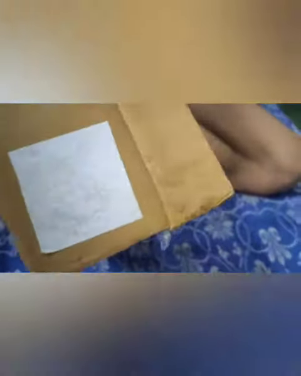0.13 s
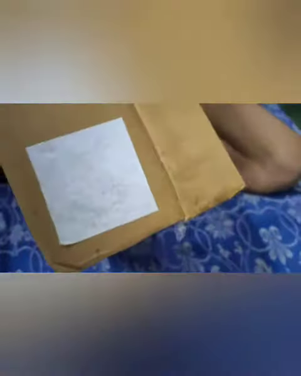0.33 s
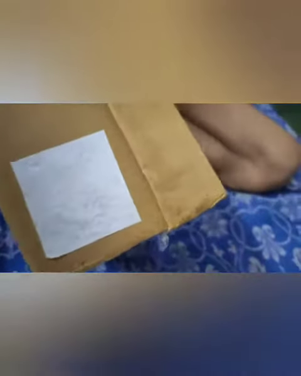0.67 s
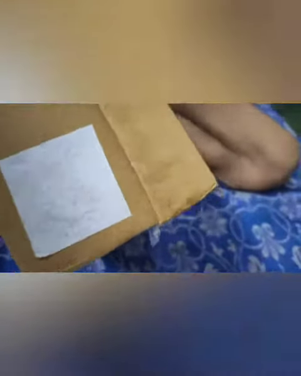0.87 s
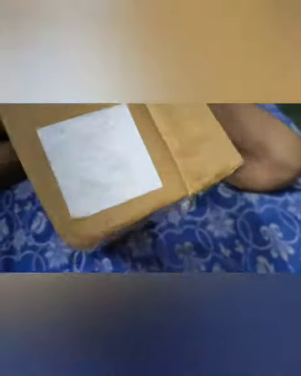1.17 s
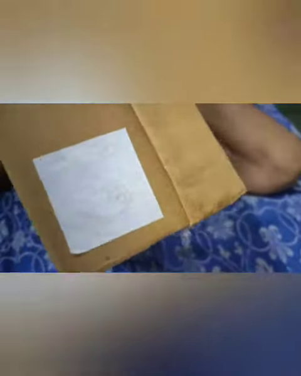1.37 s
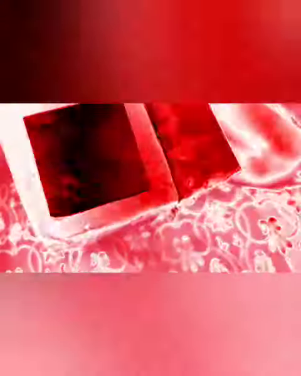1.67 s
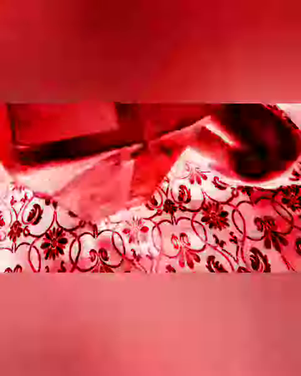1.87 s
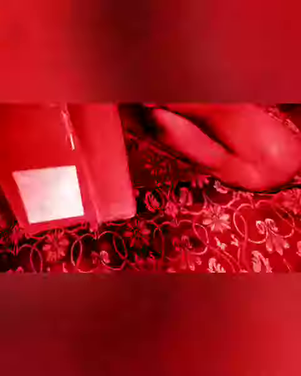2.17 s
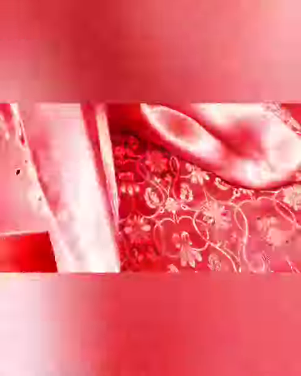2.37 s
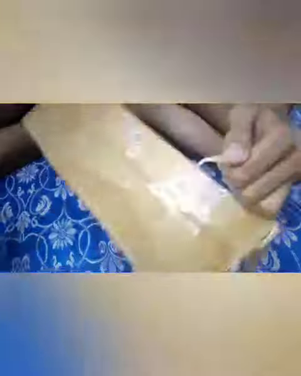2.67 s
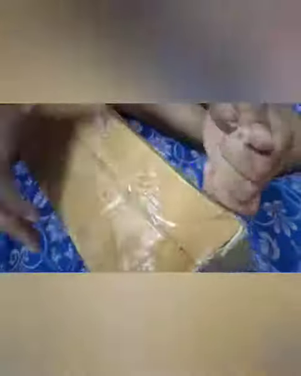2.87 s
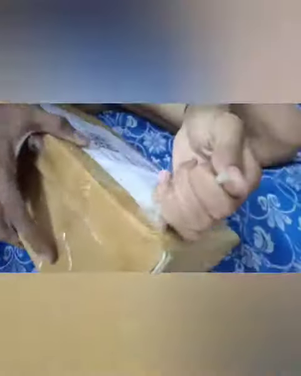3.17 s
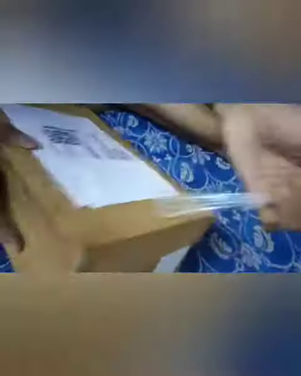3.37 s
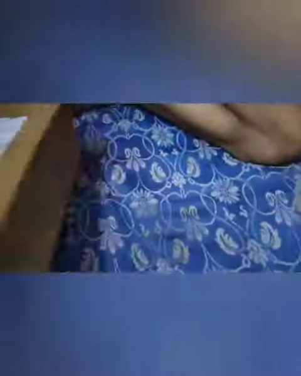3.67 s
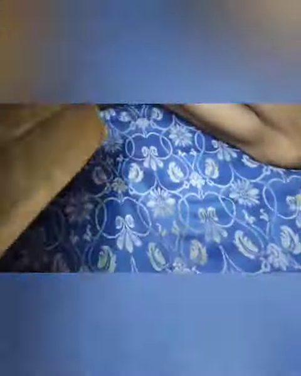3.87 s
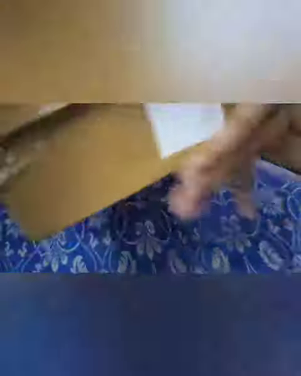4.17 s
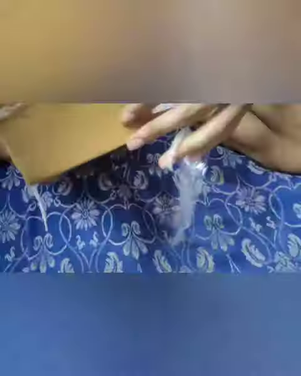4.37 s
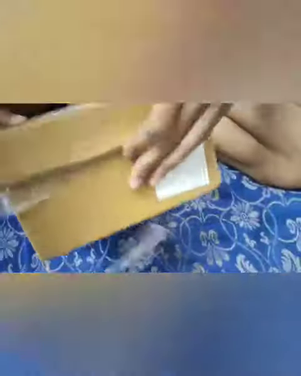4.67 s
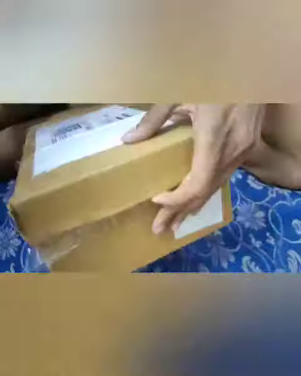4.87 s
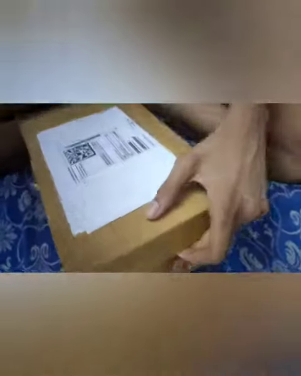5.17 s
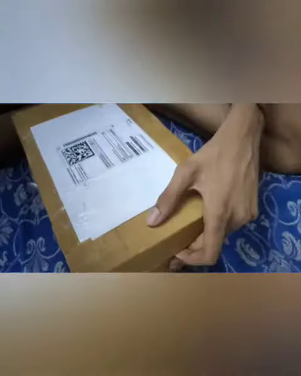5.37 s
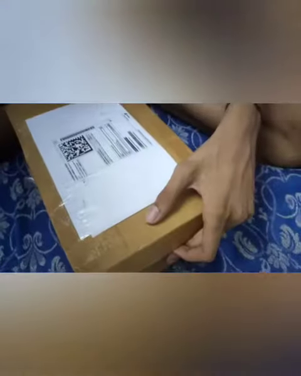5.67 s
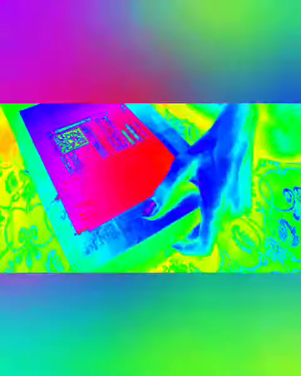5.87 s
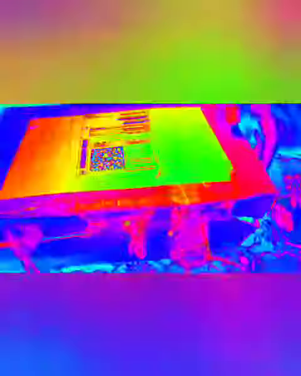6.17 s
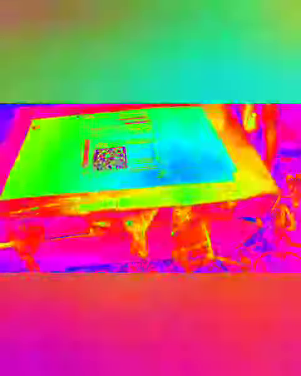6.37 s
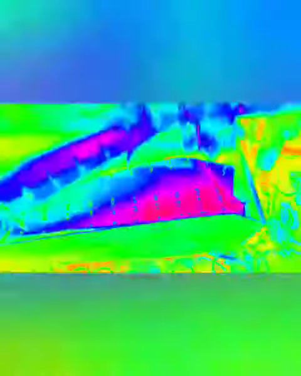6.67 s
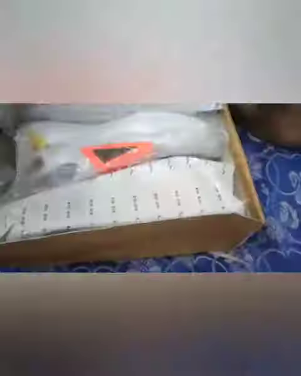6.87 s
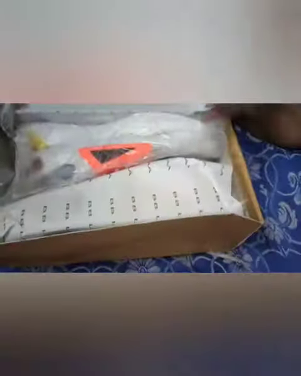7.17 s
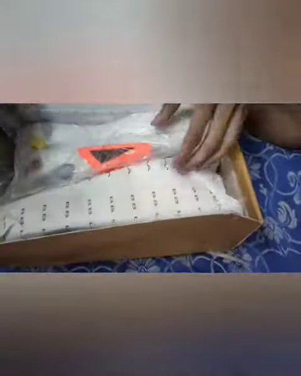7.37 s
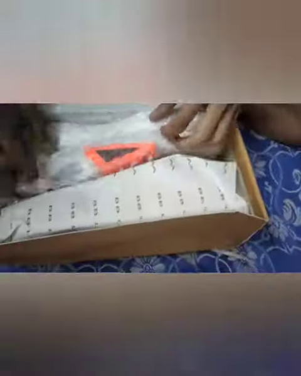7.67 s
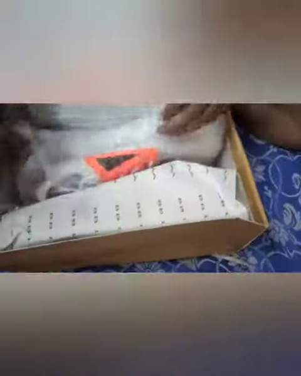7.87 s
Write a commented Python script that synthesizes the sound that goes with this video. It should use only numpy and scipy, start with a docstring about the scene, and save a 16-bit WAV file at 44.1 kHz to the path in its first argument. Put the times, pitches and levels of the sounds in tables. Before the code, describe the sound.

A cardboard parcel is handled on a bed, close to a phone. Crisp creases and a sudden tear come first, then soft knocks and air rumbling on the microphone. Bright snaps lead to a loud ripping tape pull. It calms to room tone and a faint cricket outside, cuts to dead silence, and returns with small ticks and hissy plastic film rustle.

```python
"""A bedroom: hands pull tape and brown paper off a cardboard parcel on a bed, close to a hand-held phone; a bag rustles.
Snaps are ringing noise bursts, rips and rustle are gated noise, box thuds are damped sines with rough overtones.
Low noise and smooth pulses make air on the microphone ports and some box bumps; narrow-band noise makes
a cricket outside, over room tone. The sound is cut for a moment, then the microphone offset swings and settles."""
import sys
import numpy as np
from scipy import signal
from scipy.fft import rfft, irfft, next_fast_len
from scipy.io import wavfile
from scipy.ndimage import uniform_filter1d, map_coordinates

SR = 44100
rng = np.random.default_rng(int(sys.argv[2]) if len(sys.argv) > 2 else 0)


def file_out(sig):
    """Save sig as 16-bit WAV at sys.argv[1]."""
    # one column per channel
    cols = np.atleast_2d(sig).T
    # limit, then scale
    lim = np.clip(cols, -1, 1)
    pcm = np.round(lim * 32767).astype(np.int16)
    wavfile.write(sys.argv[1], SR, pcm)


def invert_db(x):
    """Field ratio 10**(x/20) for x, a level in decibels (scalar or array-like)."""
    u = np.asarray(x, float) / 20
    return 10 ** u


N = 353241


def unit(x):
    """Scale to rms 1."""
    return x / np.sqrt(np.mean(x ** 2) + 1e-20)


def curves(table):
    """One value per sample for each column after the time."""
    time_s, *columns = np.transpose(table)
    return [np.interp(np.arange(N) / SR, time_s, column) for column in columns]


def filtered(x, response):
    """x times a response of frequency."""
    m = next_fast_len(x.shape[-1] + 4096)
    spectrum = rfft(x, m) * response(np.fft.rfftfreq(m, 1 / SR))
    return irfft(spectrum, m)[..., :x.shape[-1]]


def along(points, hz):
    """(frequency [Hz], value) points read on a log frequency axis."""
    f, v = np.transpose(points)
    return np.interp(np.log(hz + 1), np.log(f + 1), v)


def coloured(x, spectrum):
    """x with a (frequency [Hz], level [dB]) colour, rms 1."""
    return unit(filtered(x, lambda hz: invert_db(along(spectrum, hz))))


def mode(hz, centre_hz, width_hz):
    """Response of one causal resonance."""
    return 1j * hz * width_hz / (centre_hz ** 2 - hz ** 2 + 1j * hz * width_hz)


def wobble(knots_per_s):
    """A smooth random curve."""
    knots = rng.standard_normal(int(N * knots_per_s / SR) + 4)
    return map_coordinates(knots, [np.arange(N) * knots_per_s / SR])


def panned(x, pan_db):
    """Half of the left-right level difference goes to each side."""
    return x * invert_db(np.array([pan_db / 2, -pan_db / 2]))


def crackle(rate_hz, spread_db, life_s, bed, alike):
    """Stereo noise gated by tiny random releases; the part shared by both ports reaches the left one later."""
    sizes = (rng.random(N) < rate_hz / SR) * invert_db(spread_db * rng.standard_normal(N))
    gate = signal.lfilter([1], [1, -np.exp(-1 / (life_s * SR))], sizes)
    shared, left, right = rng.standard_normal((3, N))
    share = np.clip(alike, 0, 1)
    late = np.roll(shared, 6)  # samples
    pair = np.sqrt(share) * np.array([late, shared]) + np.sqrt(1 - share) * np.array([left, right])
    return pair * (unit(gate) + bed)


def patchy(x, depth_db, bins, frames):
    """Random patches of gain over pitch and time: the sheet's resonances shift as it bends."""
    z = signal.stft(x, nperseg=256)[2]
    field = rng.standard_normal(z.shape[1:])
    field = uniform_filter1d(field, int(bins), 0)
    field = uniform_filter1d(field, int(frames), 1)
    return unit(signal.istft(z * invert_db(depth_db * unit(field)), nperseg=256)[1][:, :N])


# room tone colour: (frequency [Hz], level [dB])
ROOM_TONE_COLOUR = [(59, -31.5), (100, 0), (277, -12.5), (452, -17.5), (634, -10.5), (768, -20.5),
                    (950, -16.5), (4200, -32.5), (5080, -28), (6150, -34.5), (10700, -33), (14400, -47),
                    (16000, -66)]


def room_tone():
    """Distant household hum and microphone hiss: coloured noise, partly shared by the ports."""
    noise = rng.standard_normal((3, N))
    drift_db = 1.2 * wobble(1)
    return invert_db(-54.5 + drift_db) * coloured(1.1 * noise[0] + noise[1:], ROOM_TONE_COLOUR)


# reference phrase starts before and after the cut: (time [s], time [s])
CRICKET_STARTS = [5.54, 6.99]
PHRASE_EVERY_S, PHRASE_S, PHRASE_RAMP_S = .56, 0.48, 0.3
CRICKET_GAIN_DB = -58  # before the phrase envelope


def cricket():
    """A far wing file, blurred by walls: narrow-band noise that swells with each phrase."""
    t = np.arange(N) / SR
    since = (t - np.where(t < CUT[1], *CRICKET_STARTS)) % PHRASE_EVERY_S
    phrase = np.clip(np.minimum(since, PHRASE_S - since) / PHRASE_RAMP_S, 0, 1)

    def wing(hz):
        return mode(hz, 5020, 450) ** 3 + .35 * mode(hz, 5550, 450) ** 3

    return invert_db(CRICKET_GAIN_DB) * phrase * unit(filtered(rng.standard_normal((2, N)), wing))


# low rumble, air on the ports, and box bumps near 2.5 s:
# (time [s], level before gain [dB], left-right [dB])
RUMBLE_LEVELS = [(0, -51.5, 7.5), (.43, -41.5, -8.5), (.85, -45.5, 1), (1.0, -39, -22), (1.38, -44, 0),
                 (1.73, -40, -16), (2.0, -41.5, 1), (2.38, -52.5, -15), (2.5, -29, -2), (2.84, -43, -7.5),
                 (3.25, -42, -4), (3.4, -34.5, -10), (3.81, -49.5, 1.5), (4.88, -50, 4.5),
                 (5.2, -42.5, 1.5), (5.4, -54.5, -1), (5.9, -56, 3.5), (6.4, -60.5, 5), (6.9, -41, -11.5),
                 (7.1, -41, -3), (7.25, -35.5, -8), (7.4, -41.5, -11.5), (8.01, -45, -14)]
# rumble colour: (frequency [Hz], level [dB])
RUMBLE_COLOUR = [(7.1, -29), (12, 13), (59, 1.5), (145, -10), (215, -18.5), (250, -21), (320, -37),
                 (550, -120)]
# single low pops and one box bump at 2.544 s, as smooth pulses:
# (time [s], right peak [dB], nominal frequency [Hz], left-right [dB])
LOW_PULSES = [(0.192, -27.5, 123, -14), (0.933, -24.5, 125, -28), (1.141, -20, 108, -24),
              (1.484, -25.5, 163, -21), (1.678, -13, 217, -36), (1.748, -19, 185, -25),
              (1.765, -22, 132, -19), (1.852, -19, 199, -33), (2.544, -8, 186.8, -5.5),
              (6.713, -39, 128, -18), (7.175, -14, 143, -29), (7.217, -32, 144, -20),
              (7.291, -17.5, 112, -28), (7.438, -23, 123, -31)]
RUMBLE_GAIN_DB = 3.5


def low_rumble():
    """Air on the ports and some box bumps: lumpy low noise plus Gaussian-windowed cosine pulses."""
    level_db, pan_db = curves(RUMBLE_LEVELS)
    lumps = invert_db(3.9 * np.array([wobble(19), wobble(10)]))
    lumpy = unit(lumps * coloured(rng.standard_normal((2, N)), RUMBLE_COLOUR))
    out = panned(invert_db(level_db + RUMBLE_GAIN_DB) * lumpy, pan_db)
    t = np.arange(-SR // 25, SR // 25) / SR
    for s, db, hz, lean_db in LOW_PULSES:
        pulse = np.exp(-(hz * t / 0.52) ** 2) * np.cos(2 * np.pi * 0.65 * hz * t)
        start = round((s + t[0]) * SR)
        out[:, start:][:, :len(t)] += np.outer(invert_db([db + lean_db, db]), pulse)
    return out


# room decay: (frequency [Hz], T60 [s])
WALL_T60 = [(200, 0.36), (2000, 0.2), (10000, 0.22)]


def walls(x):
    """The room's answer: decaying noise in which each frequency dies at its own speed."""
    hz, t, z = signal.stft(rng.standard_normal((2, SR // 2)), SR, nperseg=256)
    decay = invert_db(-60 * t / along(WALL_T60, hz)[:, None])
    tail = signal.istft(z * decay, SR, nperseg=256)[1]
    delayed = np.pad(x, ((0, 0), (300, 0)))  # samples
    return signal.fftconvolve(delayed, tail / np.linalg.norm(tail[0]), axes=1)[:, :N]


# box knocked or flexed: (time [s], level before gain [dB], frequency [Hz])
BOX_THUDS = [(.413, -32, 268.6), (.841, -38, 326), (.989, -37, 151), (1.072, -27.5, 208),
             (1.374, -33.5, 159), (2.44, -12.5, 330), (2.461, -14, 246), (2.538, -16, 158),
             (2.568, -20, 312), (2.622, -18.5, 237), (2.655, -19, 185), (2.693, -32.5, 262),
             (2.936, -37, 220), (3.179, -31, 587), (3.251, -31.5, 240), (3.291, -27, 288),
             (3.338, -20.5, 570), (3.702, -30.5, 178), (4.207, -34, 171), (6.949, -37, 396)]
THUD_T60_S, THUD_GAIN_DB = 0.032, 10.0


def thuds():
    """The hollow box answers with one low, quickly damped note and a rough overtone."""
    out, t = np.zeros((2, N + SR)), np.arange(SR // 5) / SR
    for s, db, hz in BOX_THUDS:
        soft = (1 - np.exp(-t / 0.0023)) ** 2 * invert_db(-60 * t / THUD_T60_S)
        rough = filtered(rng.standard_normal((2, len(t))), lambda f: mode(f, 1.47 * hz, 2.1 * hz) ** 2)
        note = np.sin(2 * np.pi * hz * t)
        out[:, round(s * SR):][:, :len(t)] += invert_db(db + THUD_GAIN_DB) * soft * (note + 0.45 * unit(rough))
    return out[:, :N]


# underlying rustle, slow handling of the parcel, then the bag from 7.25 s, starting abruptly:
# (time [s], bright level [dB])
UNDERLYING_RUSTLE = [(0, -34), (.28, -42.5), (.31, -49), (.6, -54.5), (1.0, -60), (1.6, -48), (2.1, -55),
                     (2.4, -61), (2.9, -59.5), (3.2, -45), (3.7, -46.5), (4.15, -59.5), (4.6, -62),
                     (4.85, -67.5), (5.7, -70.5), (5.9, -76.5), (6.4, -60), (6.9, -48.5), (7.235, -83),
                     (7.26, -42), (7.45, -42), (7.6, -37.5), (7.7, -32.5), (7.8, -33.5), (7.89, -28.5),
                     (8.01, -38)]
# grips, pulls, slides: (full-strength time [s], hold [s], bright level [dB], dull level [dB])
HAND_STROKES = [(0.13, .01, -34, -48.5), (0.242, .01, -30, -44), (.39, .02, -30, -53),
                (.7, .01, -45.5, -75), (0.74, .01, -39, -61), (0.83, 0.0089, -47, -44),
                (0.935, 0.0045, -47.5, -49), (1.002, .005, -34, -41), (1.195, .005, -40.5, -44.5),
                (1.28, 0.00927, -40.5, -49.5), (1.375, 0.0084, -37.5, -46), (2.005, .02, -51, -47),
                (2.451, 0.036, -33.5, -36), (2.539, .03, -38.5, -39.5), (2.626, 0.0086, -37, -37),
                (2.978, 0.0089, -43.5, -60), (3.092, 0.011, -42, -39), (3.191, 0.071, -52, -48),
                (3.26, .03, -33, -41), (3.334, .05, -14.5, -23), (3.449, 0.07, -27, -35.5),
                (3.896, .01, -42.5, -58.5), (4.175, .04, -44.5, -49.5), (4.482, .02, -50.5, -55),
                (4.628, .04, -51.5, -52), (4.74, .02, -55, -56.5), (5.235, .005, -57, -59),
                (6.4, .01, -55, -59.5), (6.524, 0.009, -35.5, -46.5), (6.612, 0.037, -57.5, -47),
                (6.77, .02, -41, -46), (6.822, .04, -40, -46), (6.94, 0.004, -41, -42),
                (7.491, .01, -40, -42), (7.677, .1, -43.5, -50), (7.87, .04, -41, -45.5)]
RISE_DB_PER_S, FALL_DB_PER_S = 450.5, 160.5  # of a stroke
SCRAPE_MEAN_DB, SCRAPE_FOLLOWS = -62, 0.51  # dull dB at mean underlying rustle, dull dB per bright dB


def handling():
    """Bright and dull levels in dB: underlying rustle plus strokes that rise fast and die more slowly."""
    t, (bed_db,) = np.arange(N) / SR, curves(UNDERLYING_RUSTLE)
    bright_power = invert_db(bed_db) ** 2
    dull_power = invert_db(SCRAPE_MEAN_DB + SCRAPE_FOLLOWS * (bed_db - bed_db.mean())) ** 2
    for s, hold_s, bright_db, dull_db in HAND_STROKES:
        before_s, after_s = np.maximum(s - t, 0), np.maximum(t - s - hold_s, 0)
        shape = invert_db(-RISE_DB_PER_S * before_s - FALL_DB_PER_S * after_s) ** 2
        bright_power = bright_power + shape * invert_db(bright_db) ** 2
        dull_power = dull_power + shape * invert_db(dull_db) ** 2
    return 10 * np.log10(bright_power), 10 * np.log10(dull_power)


# where the hands work: (time [s], left-right [dB])
HAND_PAN = [(0, -1), (.7, 1), (1.2, 0), (1.8, 2), (2.9, -1.5), (4.0, -1.5), (5.2, 3.5), (6.4, -2.5),
            (6.75, 1.5), (7.45, -1.5), (8.01, 0)]
# colours of stiff paper, thin bag, board on cloth: (frequency [Hz], level [dB])
PAPER_COLOUR = [(880, -32.5), (1500, -9.5), (2300, -5), (2880, -11), (3120, -5.5), (5120, -7.5), (6500, -3),
                (8320, -7.5), (10200, 1), (16000, -11.5)]
BAG_COLOUR = [(880, -37.5), (1500, -8), (2300, -11), (3310, -14.5), (3810, -8.5), (4370, -9), (10500, 0),
              (16000, -10.5)]
SCRAPE_COLOUR = [(150, -16), (250, -2), (540, -8.5), (611, -3.5), (880, -9), (1450, -11.5), (3000, -11),
                 (3900, -51), (6600, -120)]
BAG_FROM_S = 7.25  # hands reach the bag


def rustle(bright_db, dull_db):
    """Countless small creases: a bright crackle in clumps and a duller scrape of board on cloth."""
    pan_db, = curves(HAND_PAN)
    on_bag = np.arange(N) / SR > BAG_FROM_S
    clumps_db = 0.8 * wobble(68) + 0.4 * wobble(23)
    bed = np.where(on_bag, 2.2, .55)  # thin film hisses, stiff paper ticks
    grains = crackle(300, spread_db=2.0, life_s=0.0029, bed=bed, alike=0.12) / np.hypot(1, bed)
    bright = np.where(on_bag, coloured(grains, BAG_COLOUR), coloured(grains, PAPER_COLOUR))
    top = filtered(bright, lambda hz: 1 / (1 + (11500 / (hz + 1)) ** 8))
    top_db = np.minimum(0.32 * (bright_db + 32.0), 0)  # gentle handling is duller
    bright = bright - top * (1 - invert_db(top_db))
    dull = coloured(crackle(250, spread_db=3.0, life_s=0.0017, bed=1.0, alike=0.94), SCRAPE_COLOUR)
    bright = patchy(bright, depth_db=2.5, bins=3.6, frames=9)
    dull = patchy(dull, depth_db=2.5, bins=2.3, frames=7)
    return panned(invert_db(bright_db + clumps_db) * bright + invert_db(dull_db + clumps_db) * dull, pan_db)


# fast pulls, each with the room's dying hiss after it, one list each: (time [s], level [dB])
RIP_LEVELS = [
    [(.355, -43.5), (.358, -4.5), (.368, -5.5), (.379, -10), (.383, -20), (.43, -31.5), (.56, -52)],
    [(2.435, -42), (2.439, -13), (2.452, -10), (2.458, -35), (2.49, -32.5), (2.6, -45.5)],
    [(3.29, -48), (3.322, -23), (3.338, -6), (3.385, -5.5), (3.408, -10), (3.428, -6.5), (3.442, -10),
     (3.478, -23), (3.55, -21.5), (3.575, -37.5)],
]
# colours of short paper tears, long tape pull: (frequency [Hz], level [dB])
TEAR_COLOUR = [(180, -12), (300, -8), (885, -16), (1780, -2), (2700, -5.5), (3830, -2.5), (8790, -1),
               (16000, -6)]
TAPE_COLOUR = [(88, -43), (150, -14), (222, -6.5), (368, -30), (484, -11.5), (774, -9), (871, -4.5),
               (2600, -12.5), (9260, 2), (16000, -8)]


def rips():
    """Fibres and glue let go in dense, harsh, uneven hiss; each pull ends in the room's dying hiss."""
    out, t = np.zeros((2, N)), np.arange(N) / SR
    hiss = crackle(2500, spread_db=4, life_s=.0006, bed=.8, alike=.15)
    hiss = patchy(hiss, depth_db=-2.0, bins=7.6, frames=4.8)
    colours = (TEAR_COLOUR, TEAR_COLOUR, TAPE_COLOUR)
    for rows, colour, pan_db in zip(RIP_LEVELS, colours, (1.5, 1.5, -1.5)):
        level_db, = curves(rows)
        sounding = (t > rows[0][0]) & (t < rows[-1][0])
        out += sounding * invert_db(level_db) * panned(coloured(hiss, colour).T, pan_db).T
    return out * invert_db(1.5 * wobble(150))


TICKS_DRAWN, TICK_FROM_DB = 60, -59  # ticks in quieter rustle drop to -120 dB
TICK_OVER_RUSTLE_DB, TICK_SPREAD_DB, TICK_TOP_DB = 6, 7.5, -34.5
TICK_MEDIAN_MS, TICK_MEDIAN_HZ, TICK_MEAN_BODY_DB = 1.1, 9000, -8.5


def ticks(bright_db):
    """Small creases at chance moments, levels scattered about the rustle; returns rows for snaps()."""
    s, chance = rng.random(TICKS_DRAWN) * (N - 1) / SR, rng.standard_normal((TICKS_DRAWN, 4))
    rustle_db = bright_db[(s * SR).astype(int)]
    db = np.minimum(rustle_db + TICK_OVER_RUSTLE_DB + TICK_SPREAD_DB * chance[:, 0], TICK_TOP_DB)
    db[rustle_db < TICK_FROM_DB] = -120
    ms = TICK_MEDIAN_MS * np.exp(.5 * chance[:, 1])
    hz = np.minimum(TICK_MEDIAN_HZ * np.exp(.3 * chance[:, 2]), 13000)
    return list(zip(s, db, ms, hz, TICK_MEAN_BODY_DB + 3 * chance[:, 3]))


# clearest creases and tape bonds letting go:
# (time [s], level [dB], length [ms], ring [Hz], dull body over level [dB])
CLEAR_SNAPS = [(.021, -22.5, 4.3, 9880, -23), (.0388, -13.5, 1.7, 11650, -21),
               (.0462, -29.5, 7.8, 9120, -21), (.0963, -31.5, 3, 8400, -19.5), (.1078, -26.5, 3, 6080, -24),
               (.1221, -25, 6.2, 11100, -33.5), (.1389, -19, 2.8, 10090, -23), (.1583, -24, 2.7, 6180, -23),
               (.2007, -15.5, 0.73, 7330, -11.5), (.2213, -20.5, 3.3, 6590, -7.5),
               (.2358, -16.5, .9, 10460, -12), (.2531, -17, .8, 7610, -19), (.2661, -25.5, .9, 10130, -7),
               (.2957, -15.5, 0.39, 10300, -1.5), (.3302, -27, 2.6, 10280, -16.5),
               (.3488, -10.5, 3, 6020, -15), (.4136, -9, 0.95, 8650, -12), (.6741, -33, 1.6, 11270, -30),
               (.8087, -26, 0.79, 11080, -10), (.9066, -32.5, .8, 6200, -17), (.9997, -24, 0.82, 6090, -8),
               (1.0351, -21, 1.8, 3640, -8.5), (1.1155, -29.5, 1.1, 10000, -8),
               (1.3779, -38, 4.4, 2110, -2), (1.3866, -30, 0.88, 11200, -6.5),
               (1.4835, -39.5, 2, 6740, -19), (1.5145, -25, 0.45, 11100, -16.5),
               (1.5616, -29.5, 1.8, 11330, -33), (1.5794, -29, 2.1, 11530, -14.5),
               (1.616, -25.5, 0.46, 10360, -0.5), (1.6718, -23, .5, 11200, -29),
               (1.7595, -29, 0.87, 6760, -32), (2.1726, -41, 2.0, 11470, -18.5),
               (2.3682, -24.5, 0.83, 7580, -26.5), (2.3869, -28.5, 0.96, 9760, -26.5),
               (2.4378, -1, 0.97, 11520, -7.5), (2.4749, -6.5, 2.2, 6230, -30),
               (2.5693, -35.5, 3.5, 2250, -1.5), (2.6601, -36, 4.5, 10750, 1),
               (2.7328, -24.5, 0.42, 10570, -18.5), (2.8253, -35.5, .7, 7420, -16.5),
               (2.891, -22, 0.89, 11800, -44), (2.9727, -33.5, 4.2, 10460, -19.5),
               (3.0441, -17, 2.3, 10880, -20), (3.0524, -5.5, 0.33, 10620, -29.5),
               (3.0744, -27, 1.0, 12070, -14.5), (3.0879, -11.5, 0.52, 10090, -13),
               (3.1076, -12, 0.8, 10450, -24), (3.1274, -2.5, 0.54, 10070, -19.5),
               (3.134, -20.5, 0.88, 7680, -17.5), (3.1449, -5.5, 0.33, 9840, -11.5),
               (3.1829, -2.5, .5, 9990, -18), (3.297, -9.5, 1.5, 9860, -14.5),
               (3.3193, -16.5, 6.3, 8760, -13), (3.7228, -37.5, 1.8, 11850, -16),
               (3.8182, -30.5, 0.74, 10000, -29), (4.1729, -35.5, 8.2, 11280, -9),
               (4.215, -35.5, 3, 9000, -7.5), (4.272, -39.5, .8, 9000, -13), (4.501, -36.5, 1.6, 10240, -8),
               (4.7496, -37.5, .8, 5200, -23), (4.853, -46, 2.3, 6980, -8), (5.2292, -32, 1.1, 11680, -31),
               (5.2363, -38, 2.0, 2400, -18), (5.303, -44.5, 2, 6560, -9), (5.727, -46, 2.04, 6840, 0),
               (6.287, -35, .9, 11490, -26.5), (6.3821, -28, 2.1, 10920, -25),
               (6.4779, -34, 1.5, 10140, -9), (6.5255, -36, 14, 5250, -10), (6.6007, -36, 1.4, 6300, -3),
               (6.66, -33.5, 2.4, 9160, -11), (6.744, -38.5, 1.7, 11890, 3), (6.7666, -35, 3.6, 3100, 3),
               (6.7795, -33, 5.1, 7220, -3.5), (6.8118, -18.5, 0.95, 9970, -8),
               (6.832, -40, 5.0, 2290, 3.5), (6.846, -37.5, 3.1, 2320, 0.5),
               (6.8807, -33.5, 1.2, 11800, -2.5), (6.9446, -29, 1.6, 9610, -18),
               (7.4844, -29, 4.9, 10400, -13.5), (7.8462, -29.5, 11, 7760, -12)]
SNAP_PAN_SPREAD_DB = 3.5  # about the hands


def snaps(rows):
    """A crease runs in ragged steps, rings sheet and board, echoes off the box and leaves a short tail."""
    out, t = np.zeros((2, N + SR)), np.arange(SR // 25) / SR
    hands_db, = curves(HAND_PAN)
    for s, db, ms, hz, body_db in rows:
        pan_db = hands_db[int(s * SR)] + SNAP_PAN_SPREAD_DB * rng.standard_normal()
        noise = rng.standard_normal((3, len(t)))
        steps = rng.standard_normal(len(t) // 30 + 1)
        ragged = invert_db(4 * np.repeat(steps, 30)[:len(t)])
        board_hz = 1350 * np.exp(.25 * rng.standard_normal())
        length_s = max(ms, .3) / 1000
        running = ragged * np.exp(-(t / length_s) ** 2) * (1 - np.exp(-t / 0.00021))
        running[66:] += 0.31 * running[:-66]  # box echo, delay in samples
        tail = invert_db(-25.5 - 60 * t / .04)
        late = np.roll(noise[0], 6)
        burst = (0.18 * np.array([late, noise[0]]) + noise[1:]) * (running + tail)
        crisp = filtered(burst, lambda f: mode(f, hz, .25 * hz) + .3 * mode(f, 8000, 15000))
        body = filtered(burst, lambda f: mode(f, board_hz, 1000) * mode(f, 1350, 1500))
        sound = unit(crisp) + invert_db(body_db) * unit(body)
        sound = sound * np.sqrt(length_s / t[-1])  # rms taken over the run
        out[:, round(s * SR):][:, :len(t)] += panned(invert_db(db) * sound.T, pan_db).T
    return out[:, :N]


def scene():
    """The parcel and bag in the room, over low rumble, cricket and room tone."""
    bright_db, dull_db = handling()
    background = room_tone() + cricket() + low_rumble()
    loud = thuds() + rips() + snaps(CLEAR_SNAPS + ticks(bright_db))
    return background + invert_db(-17.0) * walls(loud) + rustle(bright_db, dull_db) + loud


def band_limit(x):
    """A steep low-pass at the top of the band."""
    return signal.sosfilt(signal.butter(12, 16430, fs=SR, output="sos"), x)


# silence: (from [s], to [s])
CUT = (5.905, 6.27)
# left port treble shading: (frequency [Hz], level [dB])
LEFT_PORT_SHADING = [(6000, 0), (9000, -1.5), (14000, -3)]


def record(dry):
    """Left port shading, the cut, the offset that swings and settles after it, soft clipping at full scale."""
    t = np.arange(N) / SR
    left = filtered(dry[0], lambda hz: invert_db(along(LEFT_PORT_SHADING, hz)))
    shaded = np.array([left, dry[1]])
    after_s = np.maximum(t - CUT[1], 0)
    swing = (1 - np.exp(-after_s / 0.04)) * np.exp(-(after_s / 0.33) ** 1.86)
    audible = (t < CUT[0]) | (t > CUT[1])
    mix = shaded * audible + np.outer([.21, -.022], swing)
    mix = mix / (1 + np.abs(mix) ** 6) ** (1 / 6)
    return band_limit(mix)


dry = scene()
out = record(dry)
file_out(out)
```